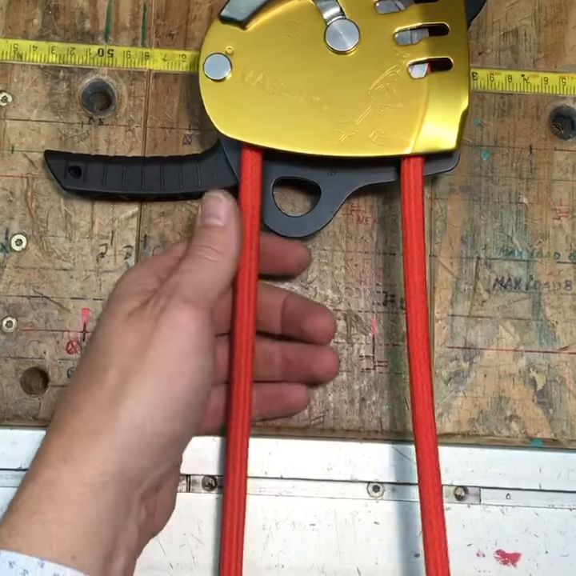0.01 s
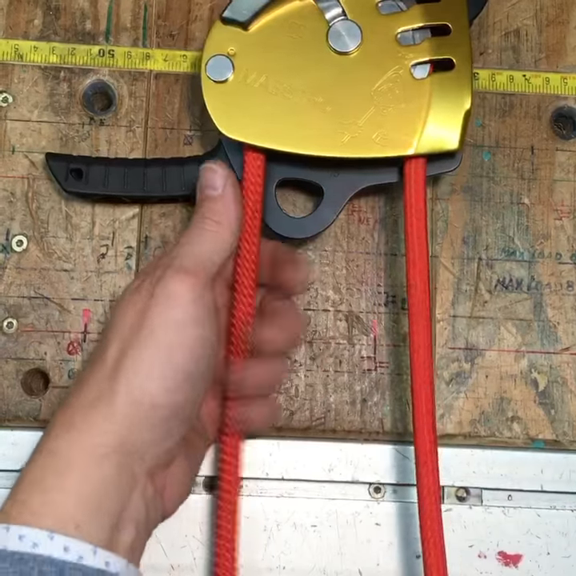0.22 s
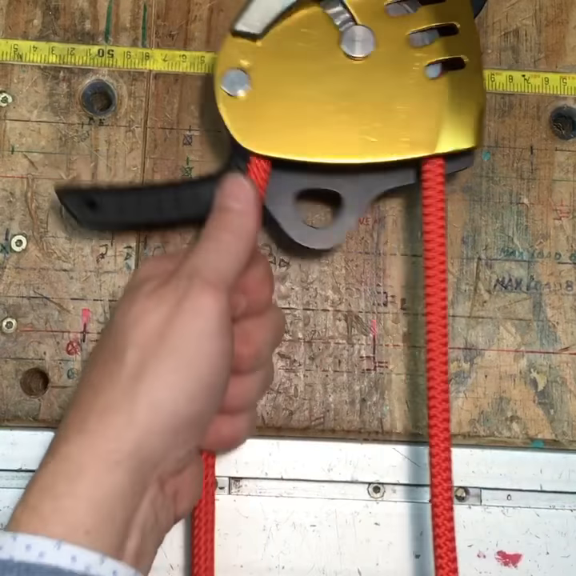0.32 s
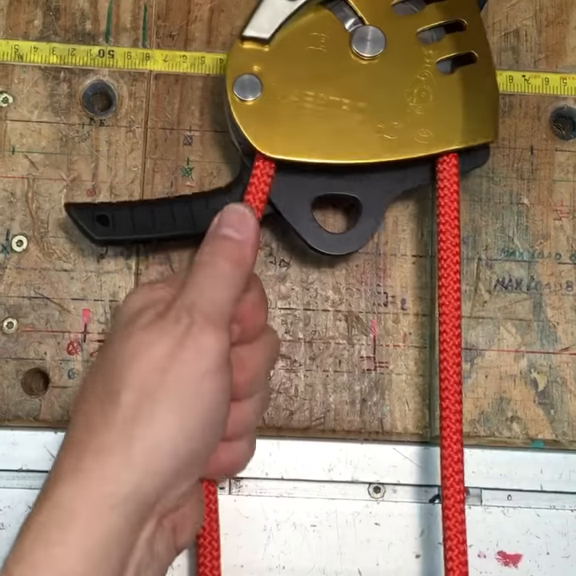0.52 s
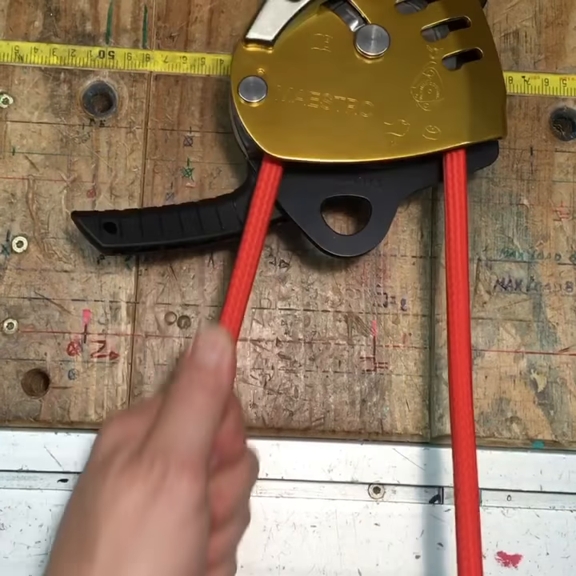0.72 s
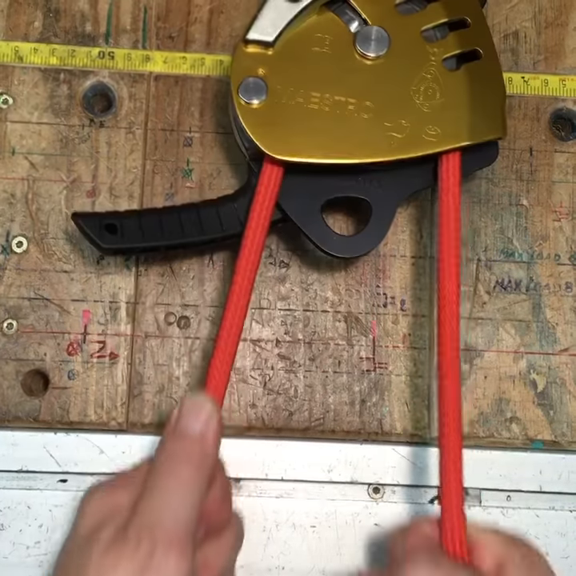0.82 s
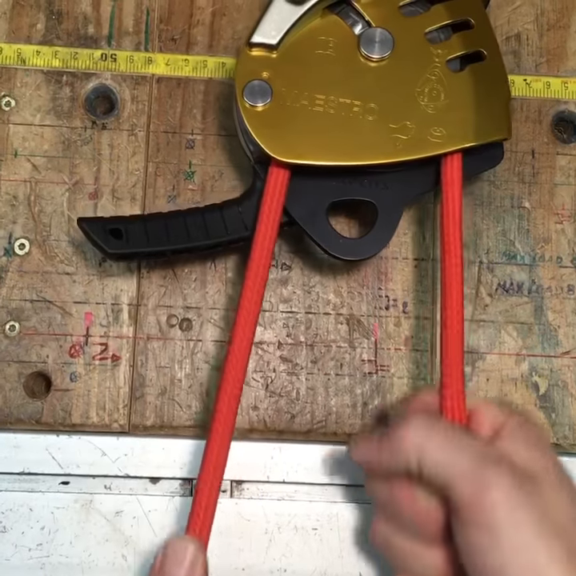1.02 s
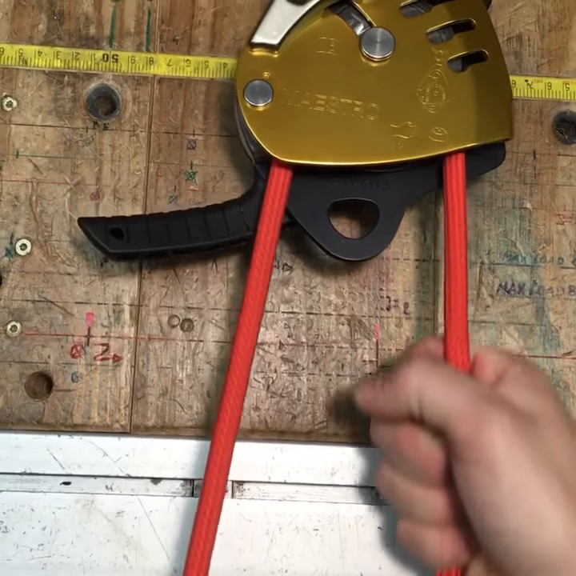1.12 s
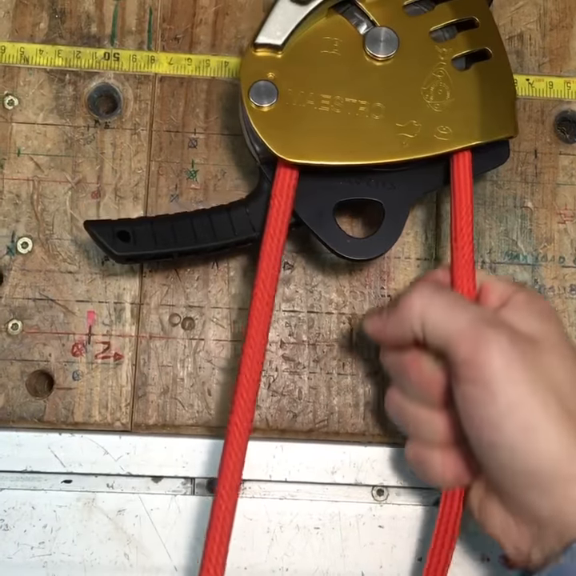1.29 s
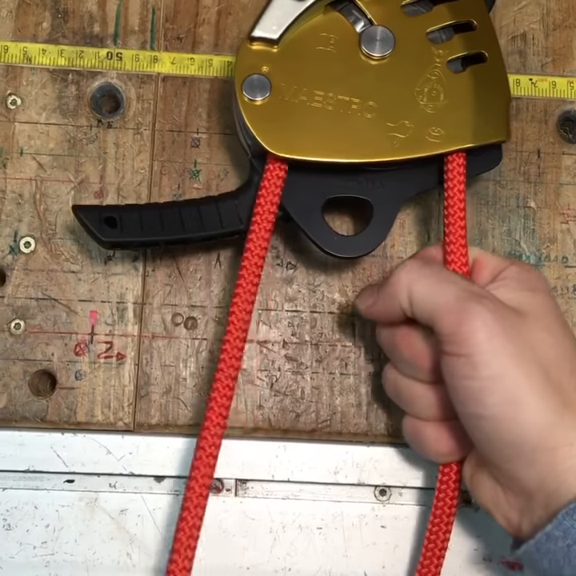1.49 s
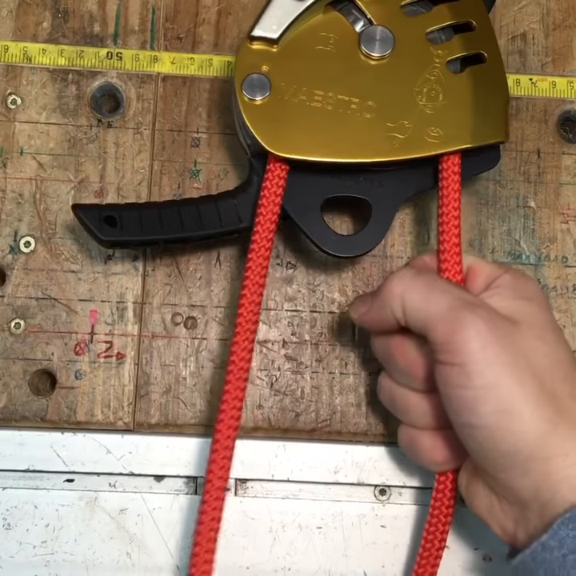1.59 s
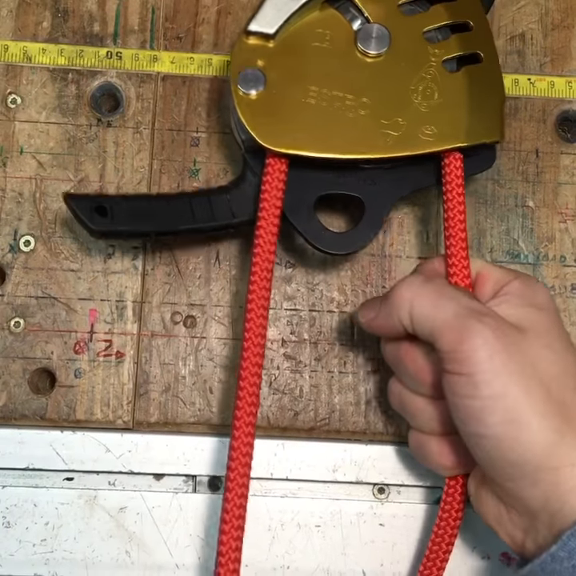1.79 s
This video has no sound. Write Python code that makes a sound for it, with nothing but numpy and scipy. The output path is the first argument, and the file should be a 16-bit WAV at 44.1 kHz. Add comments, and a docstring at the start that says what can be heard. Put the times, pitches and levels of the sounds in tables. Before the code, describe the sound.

A metal ratchet pulley on a wooden bench: a solid low knock, then a rapid run of bright, sharp clicks as rope is pulled through, slowing to a stop, then a faint tap; close microphone, quiet workshop.

```python
"""A pawl clicks over the teeth of a metal ratchet pulley: impulses excite a decaying crowd of metal modes.
The pulley lies on a wooden workbench while a rope is hauled once through it, speeding up and slowing down.
A hand takes hold and the housing knocks on the board: noise bursts and damped modes, with a deep thump.
The rope rubs softly as shaped noise through the pull; the other hand takes it and the pulley knocks again.
Hand rustle, a short diffuse echo and a steady workshop background are coloured noise too."""
import sys
import numpy as np
from scipy import signal
from scipy.fft import rfft, irfft
from scipy.io import wavfile

SR = 44100
rng = np.random.default_rng(int(sys.argv[2]) if len(sys.argv) > 2 else 0)


def int16_out(signal):
    """Quantize to a 16-bit WAV file."""
    q = np.round(np.clip(np.atleast_2d(signal).T, -1, 1) * 32767)
    wavfile.write(sys.argv[1], SR, q.astype(np.int16))


N = 79380
T = np.arange(N) / SR   # time [s]

# steady workshop background: (frequency [Hz], relative level [dB per Hz])
BACKGROUND_SPECTRUM = [(20, -14), (40, -1), (65, 6), (110, -8.5), (190, -5), (300, -15), (480, -26.5),
                       (700, -21.5), (850, -29.5), (1150, -23.5), (2000, -32), (3500, -31), (4700, -35),
                       (6500, -31.5), (15000, -32.5)]
BACKGROUND_DB = -58.5
# colour of the room's echo: (frequency [Hz], relative level [dB])
ECHO_SPECTRUM = [(70, 5), (200, 4.5), (1000, -3.5), (5000, 0), (15000, -1.5)]
ECHO_DB, ECHO_T60_S, ECHO_DELAY_S = -19, 0.21, 0.011

# a hand rubs along the rope: (middle time [s], half length [s], level [dB])
HAND_RUBS = [(0.2, 0.022, -38), (0.321, 0.039, -59), (1.652, 0.016, -53.5), (1.689, 0.014, -58)]
# colour of the rubbing: (frequency [Hz], relative level [dB per Hz])
RUB_SPECTRUM = [(60, -4), (200, 4.5), (400, -3), (500, -15), (680, -2), (850, -9), (1200, -7.5),
                (2500, -17), (5000, -25.5), (15000, -23.5)]
# the dry sheath hisses as the hands shift: (middle time [s], half length [s], level [dB])
SHEATH_SLIDES = [(0.04, 0.11, -62), (0.172, .012, -54), (1.37, 0.021, -62.5), (1.49, 0.045, -64),
                 (1.582, 0.12, -66)]
# colour of that hiss: (frequency [Hz], relative level [dB per Hz])
SHEATH_SPECTRUM = [(300, -17), (1500, -1), (3700, 1.5), (4600, -4), (7000, 0.5), (15000, -2)]

# rope running over the sheave: (frequency [Hz], relative level [dB per Hz])
ROPE_SPECTRUM = [(60, -8), (130, -19), (205, 13.5), (300, -18.5), (400, 5.5), (500, -13), (680, 3),
                 (900, -12.5), (3000, -4), (14000, -12)]
# full level from start to end, with a fade outside each
ROPE_DB, PULL_START_S, PULL_END_S, PULL_FADE_S = -53, 0.535, 1.241, 0.082

# deep thump of the bench top: middle, half length, pitch at the middle, fall of pitch, level
THUMP_S, THUMP_HALF_S, THUMP_HZ, THUMP_SAG_HZ_PER_S, THUMP_DB = 0.236, 0.017, 86.7, 600, -31.5

# the housing knocks on the bench:
# (time [s], crack [dB], housing [dB], board [dB], thud [dB], metal clink [dB])
HOUSING_KNOCKS = [(.164, -49.5, -40.5, -68, -34, -68), (0.194, -77, -55, -49, -46, -32.5),
                  (0.202, -24, -15.5, -31.5, -24.5, -33), (.226, -37, -42, -39.5, -31, -48.5),
                  (.247, -59, -58, -47, -46, -66), (1.508, -31, -46, -31.5, -46, -39.5)]
# modes of the housing: (frequency [Hz], level [dB], t60 [s])
HOUSING_RESONANCES = [(982, -11.5, .035), (1077, -5.5, 0.023), (1335, -16.5, 0.07), (1972, -6, 0.03),
                      (3590, -23.5, 0.0555)]
# modes of the board: (frequency [Hz], level [dB], t60 [s])
BOARD_RESONANCES = [(399.2, -11.5, 0.27), (655, -10.5, 0.05), (1206.5, -5.5, 0.12), (1234, -22.5, 0.08),
                    (1377, -7, 0.073), (1850, -0.5, 0.017), (2448, -7.5, 0.045), (3640, -4.5, 0.033)]
# low modes of the bench: (frequency [Hz], level [dB], t60 [s])
BENCH_RESONANCES = [(174.4, -0.5, 0.078), (205, -4, 0.15), (254.3, -9.5, 0.16)]
# dull part of the crack, which lingers: (frequency [Hz], relative level [dB per Hz])
DULL_SPECTRUM = [(60, -22), (200, 2.5), (380, -9), (490, -19.5), (650, 2.5), (820, -24), (1150, -1.5),
                 (1600, -46), (3000, -51.5), (15000, -62)]
DULL_DB, DULL_RISE_S, DULL_T60_S = -5.5, 0.0047, 0.13
# bright part of the crack, which dies first: (frequency [Hz], relative level [dB per Hz])
BRIGHT_SPECTRUM = [(300, -34), (850, -24), (1050, 0), (1550, -5.5), (1950, -1), (2250, -6), (2500, -1),
                   (3000, -12), (3700, -14.5), (4400, -16.5), (15000, -27)]
BRIGHT_RISE_S, BRIGHT_T60_S, CLINK_T60_S = 0.0017, 0.05, 0.038

# the pawl drops off a tooth: (time [s], level [dB], side plate relative to that level [dB])
PAWL_CLICKS = [(0.4384, -13, -18.5), (0.4786, -14.5, -24), (0.5056, -11, -32), (0.528, -12.5, -14),
               (0.5504, -13, -27), (0.5716, -14, -13), (0.593, -12.5, -27), (0.612, -15.5, -15),
               (0.633, -11.5, -20), (0.6517, -15.5, -12.5), (0.6713, -14, -23), (0.6913, -14, -22.5),
               (0.7128, -12.5, -19), (0.7338, -17, -17), (0.7544, -11.5, -40), (0.7738, -14.5, -15.5),
               (0.7957, -12.5, -19.5), (0.8151, -15, -18), (0.836, -12, -47), (0.856, -13, -20.5),
               (0.8777, -13, -26), (0.8982, -13.5, -15.5), (0.9212, -12.5, -38), (0.9444, -14.5, -19.5),
               (0.9698, -13, -21), (0.9956, -13, -16), (1.0235, -12, -39), (1.05, -15.5, -19.5),
               (1.0806, -12.5, -22.5), (1.1108, -14.5, -17), (1.1452, -13, -32), (1.178, -16, -12),
               (1.2112, -12, -40), (1.2475, -17.5, -23.5)]
# the loose pawl rattles: (time [s], level [dB])
PAWL_RATTLES = [(0.541, -38), (0.568, -30), (0.63, -30), (1.2554, -23.5)]
LIFT_LEAD_S, LIFT_DB = 0.0025, -18.5   # nominal lead of the tick on the tooth's crest; level re click
BOUNCE_S, BOUNCE_DB = 0.0016, -6   # nominal delay of the single rebound; level re click
# clear modes of the pulley: (frequency [Hz], level [dB], t60 [s])
PULLEY_RESONANCES = [(1288, -35, .11), (1771, -33.5, 0.053), (2427, -36.5, 0.12), (4640, -39, 0.11),
                     (5680, -28, 0.06), (7110, -26.5, 0.089), (7630, -33, 0.022), (8780, -31, 0.049),
                     (9715, -18.5, 0.038), (10800, -40, 0.018), (14300, -44, 0.015), (14000, -26, 0.025),
                     (14850, -34, 0.049)]
# modes of the side plate: (frequency [Hz], level [dB], t60 [s])
PLATE_RESONANCES = [(3540, -18.5, 0.037), (3644, -5.5, 0.039), (3704, -5.5, 0.048), (3814, -5.5, 0.044)]
# crowd of close modes in the metal: (frequency [Hz], relative level [dB per Hz])
METAL_SPECTRUM = [(200, -31.5), (950, -28), (1350, -11.5), (2400, -12), (3000, -25.5), (3700, -3.5),
                  (4300, -17.5), (5600, -6), (7300, -1.5), (8100, -6), (9600, 0.5), (11500, -4.5),
                  (13000, 3.5), (15000, 3.5), (15900, -49)]
# limits of the regions of that crowd that vary separately: frequency [Hz]
REGION_EDGES = [100, 3000, 5000, 6500, 8000, 10500, 12500, 14000, 20000]
SNAP_DB, SNAP_RISE_S, SNAP_T60_S = -11, 0.0004, 0.007
METAL_DB, METAL_RISE_S, METAL_T60_S = -11.5, 0.0005, 0.056
METAL_ALIKE = 0.1   # share of the power that repeats the same waveform at every contact

CONTACT_SPREAD_S = 0.0005   # largest random lag of a mode
MODE_SCATTER_DB, REGION_SCATTER_DB = 2.0, 1.0   # standard deviations from contact to contact
STOPBAND_HZ = 17000


def amp(db):
    """Logarithmic level: decibels to amplitude gain."""
    return 10 ** (np.asarray(db) / 20)


def noise(spectrum):
    """Spectral shaping: white noise weighted in frequency, cut below 10 Hz and scaled to rms 1."""
    hz, db = np.transpose(spectrum)
    bins = np.maximum(np.fft.rfftfreq(N, 1 / SR), 1)
    gain = amp(np.interp(np.log(bins), np.log(hz), db)) * (bins > 10)
    x = irfft(rfft(rng.standard_normal(N)) * gain, N)
    return x / x.std()


def fade(t, t60):
    """Exponential damping: gain of a free decay after t seconds, 60 dB down at t60."""
    return np.exp(-np.log(1000) * t / t60)


def burst(s, rise_s, t60):
    """Impact envelope: a linear rise from time s under a free decay."""
    age = np.maximum(T - s, 0)
    return np.minimum(age / rise_s, 1) * fade(np.minimum(age, 4 * t60), t60)


def swell(s, half_s):
    """Gaussian envelope: a smooth rise and fall around time s."""
    return np.exp(-((T - s) / half_s) ** 2)


def taps(times, db):
    """Impulsive excitation: one impulse for each contact."""
    x = np.zeros(N)
    np.add.at(x, np.clip((times * SR).astype(int), 0, N - 1), amp(db))
    return x


def ring(times, db, modes):
    """Modal resonance: contacts excite damped modes, with strength and lag varying each time."""
    out = 0
    for k, (hz, mode_db, t60) in enumerate(modes):
        radius, angle = fade(1 / SR, t60), 2 * np.pi * hz / SR
        lag = CONTACT_SPREAD_S * rng.random(len(times))
        scatter_db = MODE_SCATTER_DB * rng.standard_normal(len(times))
        force = taps(times + lag, db + mode_db + scatter_db)
        resonator = [1, -2 * radius * np.cos(angle), radius * radius]
        mode = signal.lfilter([0, np.sin(angle)], resonator, force + 1e-18)   # offset avoids denormals
        out = out + (-1) ** k * mode   # successive modes start with opposite sign
    return out


def workshop_background():
    """Stationary noise: a steady coloured background."""
    return amp(BACKGROUND_DB) * noise(BACKGROUND_SPECTRUM)


def room_echo(close):
    """Diffuse reverberation: convolution with decaying noise of unit energy."""
    tail = noise(ECHO_SPECTRUM) * burst(ECHO_DELAY_S, ECHO_DELAY_S, ECHO_T60_S)
    return amp(ECHO_DB) * signal.fftconvolve(close, tail / np.linalg.norm(tail))[:N]


def hands():
    """Friction noise: dull rustle of skin on the rope and faint hiss of its sheath."""
    out = 0
    for spectrum, moves in [(RUB_SPECTRUM, HAND_RUBS), (SHEATH_SPECTRUM, SHEATH_SLIDES)]:
        envelope = sum(amp(db) * swell(s, half_s) for s, half_s, db in moves)
        out = out + noise(spectrum) * envelope
    return out


def rope():
    """Sliding friction: the rope rubs softly through the pull."""
    inside_s = np.minimum(T - PULL_START_S, PULL_END_S - T)   # negative outside the pull
    moving = np.clip(1 + inside_s / PULL_FADE_S, 0, 1)
    return amp(ROPE_DB) * moving * noise(ROPE_SPECTRUM)


def thump():
    """Low-frequency oscillation: the bench top sways in a few slow swings, falling in pitch."""
    hz = THUMP_HZ - THUMP_SAG_HZ_PER_S * (T - THUMP_S)
    swing = np.sin(2 * np.pi * np.cumsum(hz) / SR)
    return amp(THUMP_DB) * swell(THUMP_S, THUMP_HALF_S) * swing


def knocks():
    """Impact of housing on board: noise bursts for crack and clink, short modes and a bench thud."""
    s, crack_db, housing_db, board_db, thud_db, clink_db = np.transpose(HOUSING_KNOCKS)
    parts = [(DULL_SPECTRUM, crack_db + DULL_DB, DULL_RISE_S, DULL_T60_S),
             (BRIGHT_SPECTRUM, crack_db, BRIGHT_RISE_S, BRIGHT_T60_S),
             (METAL_SPECTRUM, clink_db, BRIGHT_RISE_S, CLINK_T60_S)]
    out = 0
    for spectrum, levels, rise_s, t60 in parts:
        envelope = sum(amp(db) * burst(t, rise_s, t60) for t, db in zip(s, levels))
        out = out + noise(spectrum) * envelope
    out = out + ring(s, housing_db, HOUSING_RESONANCES)
    out = out + ring(s, board_db, BOARD_RESONANCES)
    return out + ring(s, thud_db, BENCH_RESONANCES)


def metal_wash(times, levels):
    """High modal density: each contact sounds every region of the crowd with its own strength."""
    snap = amp(SNAP_DB) * burst(0, SNAP_RISE_S, SNAP_T60_S)
    shape = amp(METAL_DB) * burst(0, METAL_RISE_S, METAL_T60_S) + snap
    same = signal.fftconvolve(taps(times, levels), shape * noise(METAL_SPECTRUM))[:N]
    crowd, bins = rfft(noise(METAL_SPECTRUM)), np.fft.rfftfreq(N, 1 / SR)
    varied = 0
    for low, high in zip(REGION_EDGES, REGION_EDGES[1:]):
        scatter_db = REGION_SCATTER_DB * rng.standard_normal(len(times))
        force = taps(times, levels + scatter_db)
        power = np.abs(signal.fftconvolve(force ** 2, shape ** 2)[:N])   # overlapping decays add in power
        region = irfft(crowd * (bins >= low) * (bins < high), N)
        varied = varied + np.sqrt(power) * region
    return np.sqrt(METAL_ALIKE) * same + np.sqrt(1 - METAL_ALIKE) * varied


def ratchet():
    """Impulsive modal excitation: tick, snap and rebound at each tooth ring sheave and side plate."""
    s, db, plate_db = np.transpose(PAWL_CLICKS)
    rattle_s, rattle_db = np.transpose(PAWL_RATTLES)
    lifts = s - LIFT_LEAD_S * rng.uniform(0.96, 1.15, len(s))
    bounces = s + BOUNCE_S * rng.uniform(0.62, 2, len(s))
    times = np.r_[s, lifts, bounces, rattle_s]
    levels = np.r_[db, db + LIFT_DB, db + BOUNCE_DB, rattle_db]
    pulley = metal_wash(times, levels) + ring(times, levels, PULLEY_RESONANCES)
    return pulley + ring(s, db + plate_db, PLATE_RESONANCES)


def scene():
    """Superposition: pulley, rope and hands close by, with the room and its background."""
    close = ratchet() + knocks() + thump() + rope() + hands()
    return (close + room_echo(close) + workshop_background())[None]


def record(dry):
    """Low-pass filtering: the top of the treble is cut, 60 dB down from the stopband edge."""
    return signal.sosfilt(signal.cheby2(16, 60, STOPBAND_HZ, fs=SR, output="sos"), dry)


dry = scene()
out = record(dry)
int16_out(out)
```